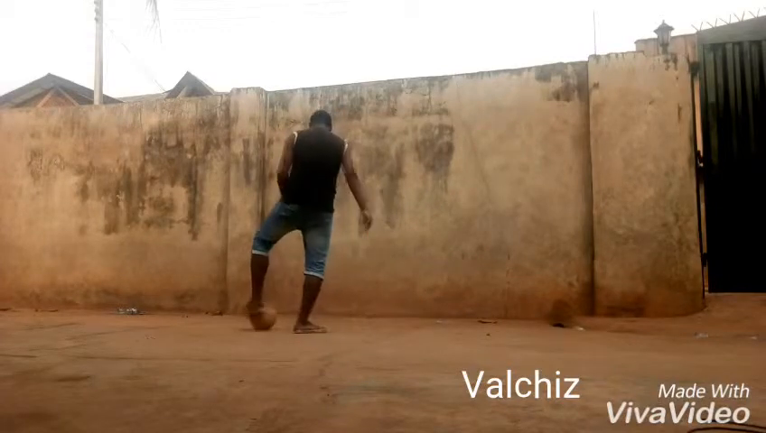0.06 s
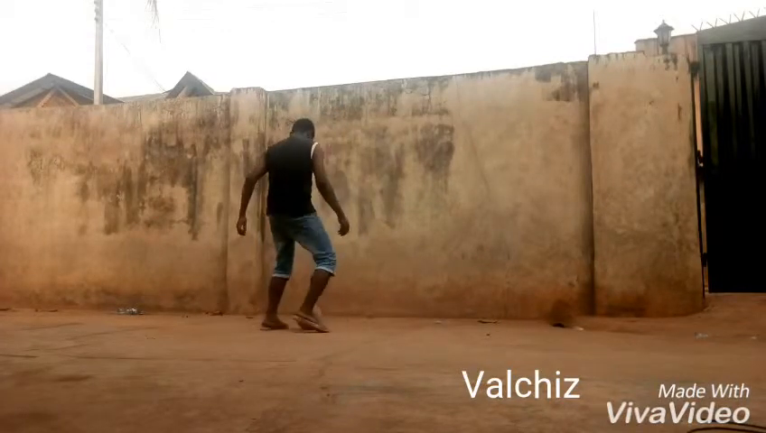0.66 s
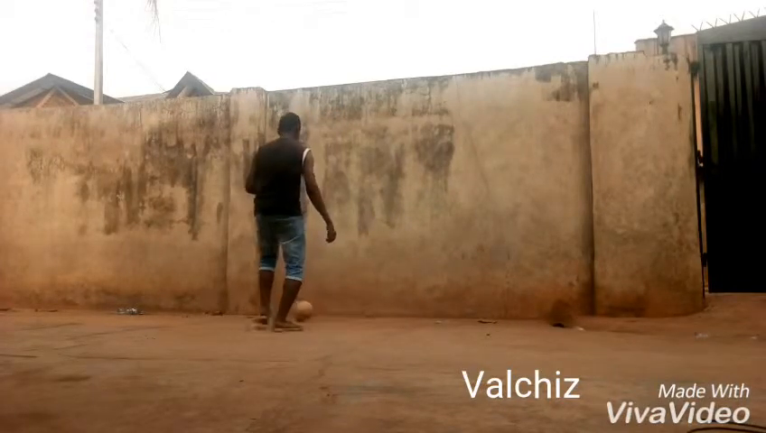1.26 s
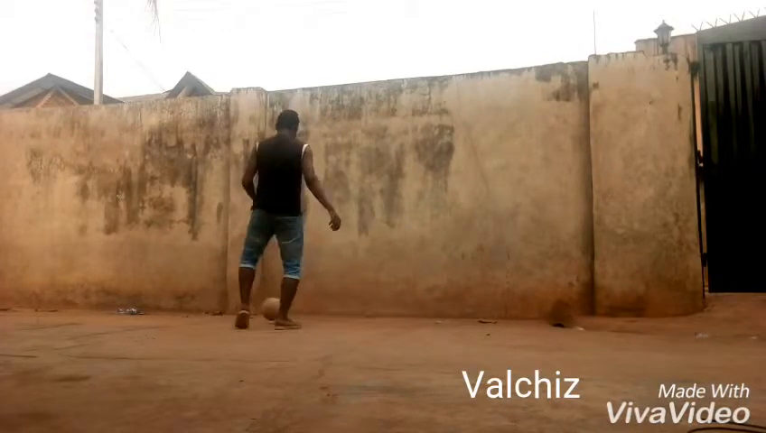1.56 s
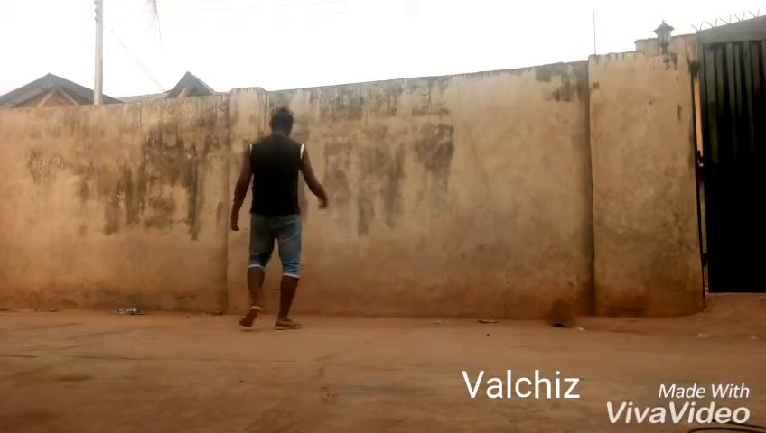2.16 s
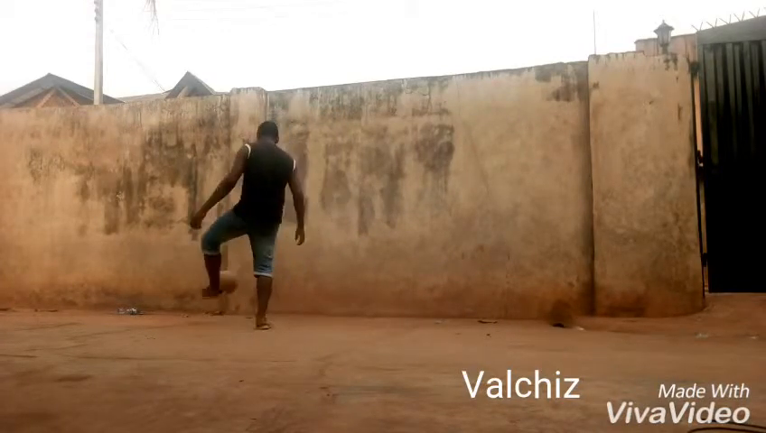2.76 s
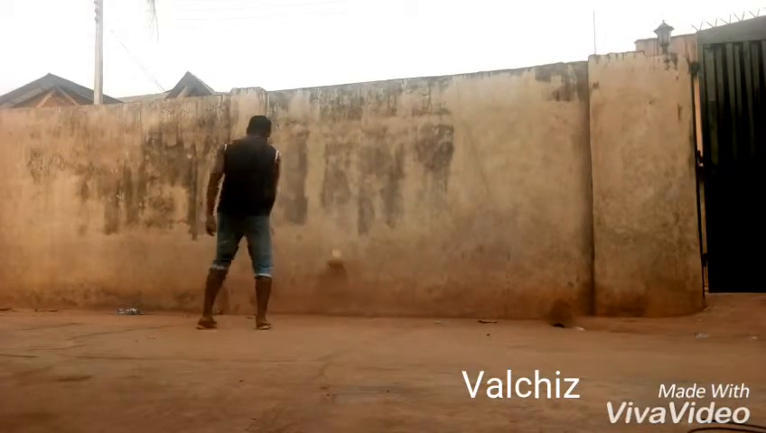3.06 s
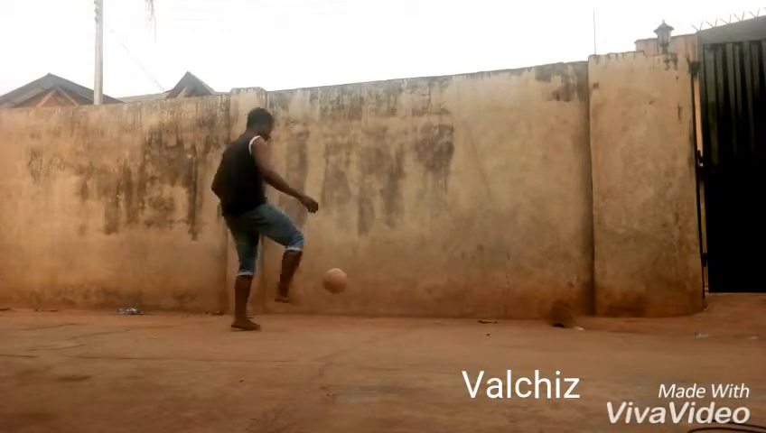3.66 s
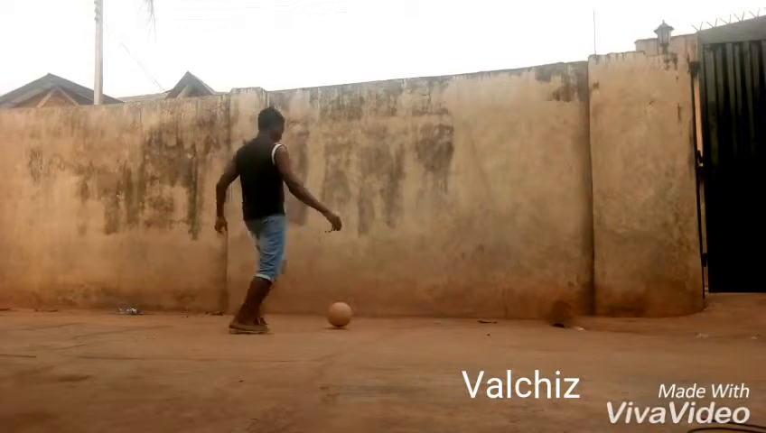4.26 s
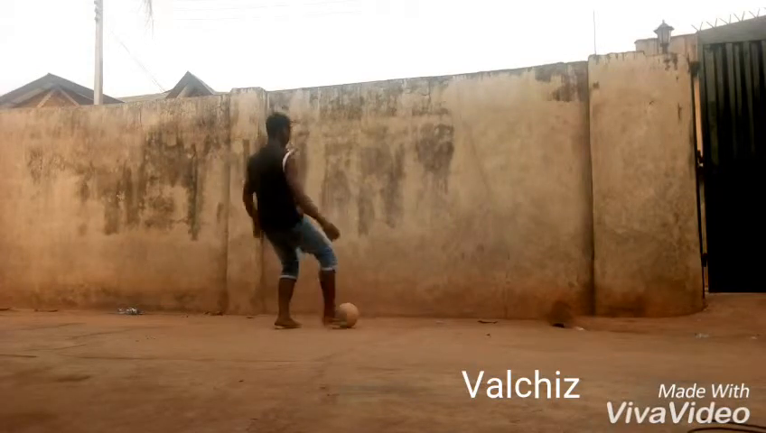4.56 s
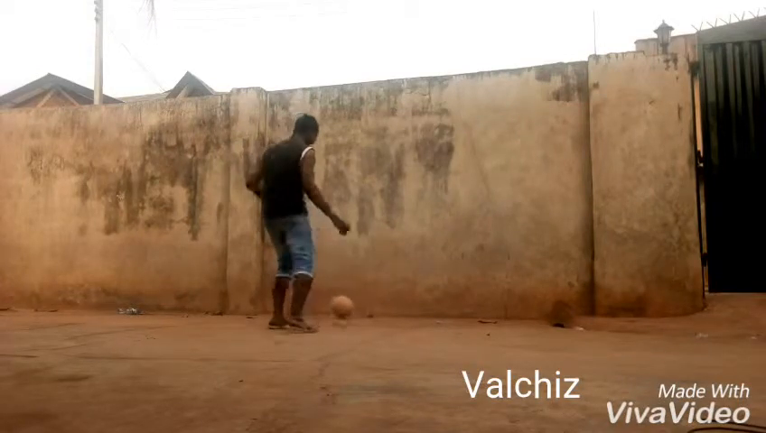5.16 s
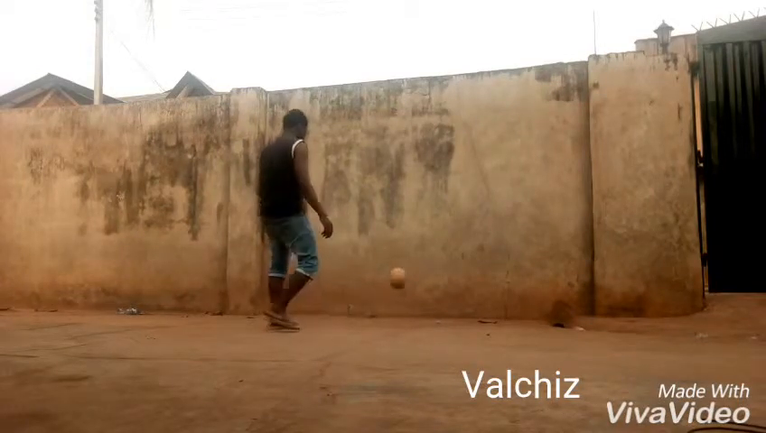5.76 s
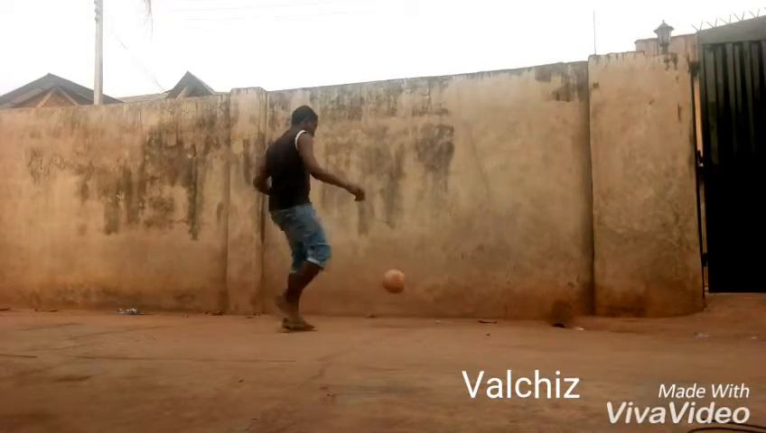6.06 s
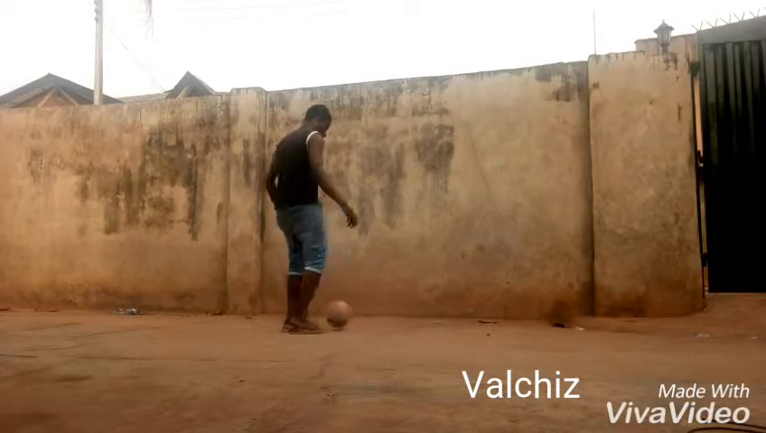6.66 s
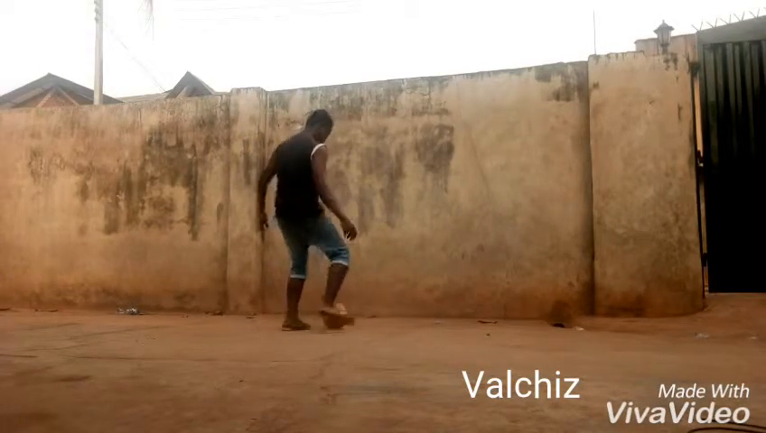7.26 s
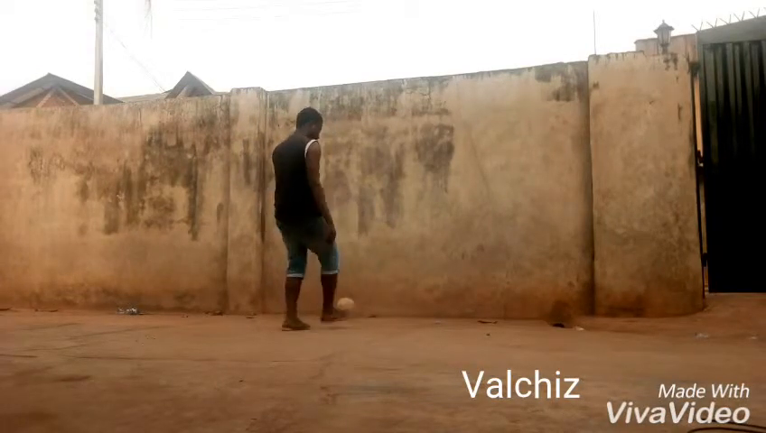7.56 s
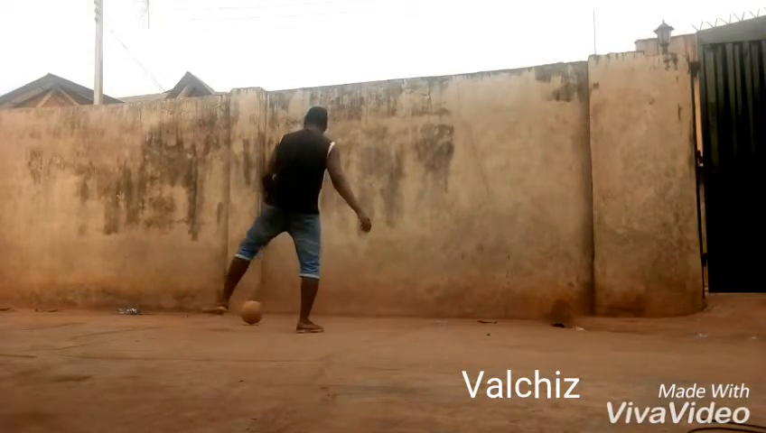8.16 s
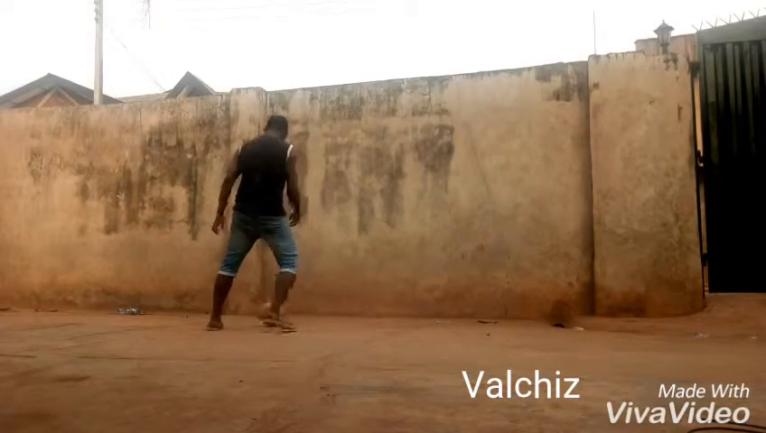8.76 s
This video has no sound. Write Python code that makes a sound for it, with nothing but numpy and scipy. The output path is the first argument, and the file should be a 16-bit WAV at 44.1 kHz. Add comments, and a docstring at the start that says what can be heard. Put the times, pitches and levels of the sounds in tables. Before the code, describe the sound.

In a walled outdoor yard, a small football is kicked against a wall six times. Each round, hollow kick is followed by a louder slapping thud that echoes with a brief low boom. Between the hits the ball bounces and is trapped, while sandals scrape on dusty paving with an occasional tick or tiny squeak. A faint neighbourhood hush lies underneath.

```python
"""A small football is kicked hard against a plastered yard wall six times, with bounces and soft touches.
Each blow layers a gritty slap of the skin, a hollow knock of the shell and a low thump as the ball
springs back; the wall hits also spray sand. Sandals and ball scrape over dusty paving, with the odd
clack or squeak, above a faint neighbourhood hush. The enclosing walls answer with echoes, a low boom
and a dense tail, and the houses beyond return the wall hits late and smeared."""
import sys
import numpy as np
from scipy import signal
from scipy.fft import rfft, irfft, next_fast_len
from scipy.io import wavfile

SR = 44100
rng = np.random.default_rng(int(sys.argv[2]) if len(sys.argv) > 2 else 0)


def put_to_file(sound):
    """Save the sound as 16-bit audio at rate SR, in the file named by the first command-line argument."""
    columns = np.atleast_2d(sound).T  # one column per channel
    safe = np.clip(columns, -1, 1)
    whole_steps = np.round(safe * 32767)
    wavfile.write(sys.argv[1], SR, whole_steps.astype(np.int16))


N = 396900
SPAN, RING = SR // 4, 32768  # samples for one contact, and for the yard's response
AGE = np.arange(SPAN) / SR
LEVEL_WINDOW_S = .08
YARD_HUM_HZ, YARD_HUM_T60_S = 210, .12  # a blow briefly sets the yard's low resonance humming

# Cue levels are relative: each layer adds its own trim before the yard.
# tone of the hush: freq_hz, level_db
HUSH_SPECTRUM = [(18, 11.5), (30, -6.5), (207, -5), (274, -6), (466, -8), (543, -10.5), (880, -10.5),
                 (1080, -19), (1290, -10.5), (1580, -17), (3130, -21.5), (6890, -31.5), (13000, -44)]
# fader ride on the hush: time_s, level_db
HUSH_RIDE = [(0, -59), (0.702, -59), (2, -60.5), (6.4, -61), (7.1, -58), (7.4, -61), (9, -60)]
# the ball lands or is trapped: start_s, thump_db, knock_db, slap_db, knock_hz, slap_tilt_db_per_octave
BOUNCE_CUES = [(0.073, -51.5, -47.5, -42.5, 730, -2), (0.813, -41, -37.5, -43, 610, -7),
               (2.4147, -37, -34.5, -39, 485, -2.5), (3.4204, -36, -35.5, -37.5, 583, -5.5),
               (3.927, -51, -58, -41.5, 573, -4), (3.954, -38.5, -35, -39, 530, -6),
               (5.989, -37, -35, -38, 850, -7), (6.502, -40.5, -38.5, -40.5, 1190, -8.5),
               (6.715, -61, -65, -49.5, 1000, -4.5), (8.496, -58, -56, -54.5, 775, -4)]
# the ball's shell and the air inside: pitch_hz, level_db, t60_s
BALL_RESONANCES = [(293, 14, 0.021), (427, 12.5, 0.06), (484, 0.5, 0.2), (545, 2.5, 0.025), (600, 14, 0.21),
                   (660, 19.5, 0.038), (736, 13, 0.09), (821, 17.5, 0.055), (850, 26, 0.063),
                   (957, 26, 0.059), (1130, 24, 0.085), (1340, 29.5, 0.015), (1428, 30.5, 0.043)]
# tone of the skin's slap: freq_hz, level_db
SLAP_SPECTRUM = [(200, -41), (700, -1), (1500, -3), (2500, -1), (4000, 1), (5500, 0.5), (6600, -6),
                 (7800, -22.5), (10500, -26.5), (13000, -44)]
# sandals or the skidding ball scrape over dusty paving: start_s, length_s, rasp_db, grit_db
SCRAPE_CUES = [(0.653, 0.036, -56, -61.5), (0.798, 0.021, -34, -37.5), (0.885, 0.028, -33, -42.5),
               (0.981, 0.028, -32.5, -41.5), (1.035, 0.051, -40, -43.5), (1.185, 0.045, -45, -47.5),
               (1.333, 0.0052, -38, -51.5), (1.599, 0.037, -52, -49.5), (3.995, 0.011, -41.5, -51),
               (4.207, 0.032, -48, -46.5), (4.445, 0.038, -59, -48.5), (4.772, 0.017, -32, -39),
               (5.051, 0.026, -41, -40), (5.106, 0.0091, -32.5, -46), (6.109, 0.019, -59, -52.5),
               (7.617, 0.021, -34.5, -38.5), (7.827, 0.029, -34, -42), (7.994, 0.025, -49.5, -58),
               (8.564, 0.04, -40.5, -45), (8.916, 0.031, -51, -70)]
# tone of a scrape's rasp around its resonance: pitch_ratio, level_db
RASP_SPECTRUM = [(.06, -15), (.2, -23), (.45, -14.5), (.7, 1), (1, 3.5), (1.22, 1), (1.5, 2), (2.1, -0.5),
                 (3, -2.5), (6, -17.5), (13, -109)]
# tone of crushed grit: freq_hz, level_db
GRIT_SPECTRUM = [(200, -27), (900, -1.5), (1800, -6), (3000, -3.5), (5400, -2.5), (6500, -10),
                 (7800, -23.5), (10500, -27.5), (13000, -44)]
# light steps that only crush grit: start_s, level_db
STEP_CUES = [(0.722, -57), (1.634, -53), (2.283, -55), (3.621, -56.5), (5.208, -50.5), (5.918, -59.5),
             (6.452, -64), (6.485, -54.5), (7.23, -63), (7.267, -63), (8.129, -63.5)]
# short bright ticks, either stray clacks or sharp wall echoes just after a ball hit: start_s, level_db
TICK_CUES = [(0.661, -73), (1.128, -48), (3.1135, -55.5), (3.421, -52), (3.9375, -56), (4.226, -45),
             (4.8885, -51), (5.929, -66), (7.7334, -45), (8.4949, -52.5), (8.529, -64), (8.609, -56),
             (8.622, -53)]
# brief rubber squeaks: start_s, level_db, pitch_hz
SQUEAK_CUES = [(.78, -59, 1410), (6.444, -53.5, 1460), (7.438, -45.5, 1375), (8.91, -59, 1400)]
# the foot drives the ball: start_s, thump_db, knock_db, slap_db, knock_hz, slap_tilt_db_per_octave
KICK_CUES = [(0.786, -50, -33.5, -53.5, 786, -5), (1.805, -38, -37.5, -47, 680, -3),
             (2.8163, -38.5, -26, -47, 880, -6), (4.652, -38.5, -36, -46.5, 729, -7),
             (5.4023, -34.5, -30, -44, 860, -4), (7.4354, -37, -33.5, -44, 980, -7)]
# the ball hits the wall: start_s, contact_s, knock_db, thump_db, slap_db, hum_db, sand_db, knock_hz
WALL_CUES = [(1.0968, 0.0088, -34, -27.5, -35, -57, -66, 765),
             (2.125, 0.012, -32.5, -29, -38.5, -35.5, -56.5, 627),
             (3.1553, 0.014, -31.5, -26.5, -38, -36.5, -60.5, 696),
             (4.8741, 0.012, -24.5, -25.5, -32.5, -46, -57, 600),
             (5.7115, .0102, -31, -24.5, -36, -34.5, -57, 651),
             (7.703, 0.011, -23.5, -27, -35, -52, -57, 550)]
# tone of sand knocked off the plaster: freq_hz, level_db
SAND_SPECTRUM = [(1500, -30), (5500, 5.5), (7500, 1.5), (10500, -9.5), (13000, -23)]
# standing waves between the walls: pitch_hz, level_db, t60_s
STANDING_WAVES = [(72.5, 13, .65), (100.5, 10, .6), (121, 6, .5), (134, 6, .45), (209, 11, .65)]
# echoes off the far walls: delay_s, level_db
WALL_ECHOES = [(.017, -16.5), (0.031, -5), (0.04, -7)]
# tone of the yard's tail: freq_hz, level_db
TAIL_SPECTRUM = [(50, 5), (130, 1.5), (250, 5), (600, 6), (1500, 1), (5000, -4.5), (12000, -2.5)]
# decay of the yard's tail: freq_hz, t60_s
TAIL_DECAY = [(60, 0.43), (250, 0.56), (550, 0.49), (1000, 0.46), (2000, 0.39), (5000, 0.48), (8000, 0.48),
              (13000, 0.14)]
# late echoes off the houses around: delay_s, spread_s, level_db
HOUSE_ECHOES = [(.09, .02, -30), (.29, .04, -44)]


def from_db(db):
    return 10 ** (np.asarray(db) / 20)


def at_level(x, db):
    """Sets a short sound's rms as if all its energy fell inside the level window."""
    return x * from_db(db) / np.sqrt(np.sum(x ** 2) / (LEVEL_WINDOW_S * SR) + 1e-20)


def at_hz(points, hz):
    """Reads a table on a log-frequency axis."""
    freqs, values = np.transpose(points)
    return np.interp(np.log(np.maximum(hz, 1)), np.log(freqs), values)


def butter(x, hz, kind, order=2):
    """Causal Butterworth filter."""
    return signal.sosfilt(signal.butter(order, hz, kind, fs=SR, output="sos"), x + 1e-18)


def coloured(x, spectrum):
    """Minimum-phase EQ, so that nothing sounds ahead of the attack."""
    size = 2 * next_fast_len(len(x))
    gain = from_db(at_hz(spectrum, np.fft.rfftfreq(size, 1 / SR)))
    cepstrum = irfft(np.log(gain))
    cepstrum[1:size // 2] *= 2
    cepstrum[size // 2 + 1:] = 0
    return irfft(rfft(x, size) * np.exp(rfft(cepstrum)))[:len(x)]


def resonate(x, hz, t60):
    """A resonance with unity gain at its peak."""
    r = from_db(-60 / (t60 * SR))
    feedback = [1, -2 * r * np.cos(2 * np.pi * hz / SR), r * r]
    return signal.lfilter([(1 - r * r) / 2, 0, (r * r - 1) / 2], feedback, x + 1e-18)


def add(track, start_s, x):
    """Mixes a short sound into a track."""
    start = max(int(start_s * SR), 0)
    track[start:start + len(x)] += x[:len(track) - start]


def push(rise_s, start_s=0):
    """A smooth pulse that swells to one over rise_s and dies away."""
    u = np.maximum(AGE - start_s, 0) / rise_s
    return (u * np.exp(1 - u)) ** 2


def neighbourhood_hush():
    """A faint bed of noise; its mids flicker, now at one pitch, now at another."""
    hush = coloured(rng.standard_normal(N), HUSH_SPECTRUM)
    hush = hush / np.std(hush)
    for position, pitch, size in rng.random((50, 3)):
        hz = 400 * 2 ** (1.7 * pitch)
        flicker = resonate(push(.03) * rng.standard_normal(SPAN), hz, t60=.03)
        add(hush, position * N / SR, at_level(flicker * size, -8))
    ride_db = np.interp(np.arange(N) / SR, *np.transpose(HUSH_RIDE))
    return from_db(ride_db) * hush


def knock(force, centre_hz, hollow_db, hollow_t60, ring_db, low_hz, sustain):
    """The contact pulse, a hollow resonance set by the spot struck, and the shell ringing near it."""
    out = butter(force, low_hz, "high", order=1)
    out += from_db(hollow_db) * resonate(force, centre_hz, hollow_t60)
    for hz, db, t60 in BALL_RESONANCES:
        nearness = np.exp(-(np.log2(hz / centre_hz) / .5) ** 2) + from_db(-14)
        chance_db, detune = rng.normal(0, 2), rng.normal(1, .008)
        ring = resonate(force, hz * detune, t60 * sustain)
        out += nearness * from_db(db + ring_db + chance_db) * ring
    return out


def thump(hz, decay_s):
    """The squashed ball draws air in and springs back: about one low cycle."""
    return -np.sin(2 * np.pi * hz * AGE) * np.exp(-AGE / decay_s)


def dust_grains(spread_db, crack_db, cracks_per_s=220):
    """Friction noise in millisecond grains of uneven size, with single sand grains cracking."""
    grain_index = np.arange(SPAN) // (SR // 1000)
    sizes = from_db(spread_db * rng.standard_normal(SPAN))[grain_index]
    friction, cracks = rng.standard_normal((2, SPAN))
    cracking = rng.random(SPAN) < cracks_per_s / SR
    return friction * sizes + from_db(crack_db) * cracks * cracking


def slap(crack_s, crunch_s, crunch_db, tilt_db):
    """A sharp crack of the skin, then dust crushed under it."""
    snap = from_db(8) * signal.unit_impulse(SPAN)
    crack = rng.standard_normal(SPAN) * np.exp(-AGE / crack_s)
    crunch = from_db(crunch_db) * dust_grains(spread_db=6.5, crack_db=16) * np.exp(-AGE / crunch_s)
    spectrum = [(hz, db + tilt_db * np.log2(max(hz, 1300) / 3000)) for hz, db in SLAP_SPECTRUM]
    return coloured(snap + crack + crunch, spectrum)


def soft_blow(thump_db, knock_db, slap_db, knock_hz, tilt_db, echo_db, crunch_db):
    """Foot or ground strikes and damps the shell; the near wall sends the blow back a moment later."""
    force = push(.00032) + 1.2 * push(.0001)
    hollow = knock(force, knock_hz, hollow_db=17, hollow_t60=.016, ring_db=7, low_hz=450, sustain=1)
    body = (at_level(thump(hz=157, decay_s=.0028), thump_db - 3.5)
            + at_level(hollow, knock_db - 10)
            + at_level(resonate(force, YARD_HUM_HZ, YARD_HUM_T60_S), thump_db - 13))
    out = np.zeros(SPAN)
    for delay_s, db in ((0, 0), (.0093, echo_db)):
        # rough plaster scatters the treble, so the echo's crack has a grain of its own
        crack = slap(crack_s=.0031, crunch_s=.017, crunch_db=crunch_db, tilt_db=tilt_db)
        add(out, delay_s, from_db(db) * (body + at_level(crack, slap_db + 2.5)))
    return out


def bounces():
    """Landings are mostly slap and crunching dust; the harder ones carry more thump and knock."""
    for start_s, *touch in BOUNCE_CUES:
        yield start_s, soft_blow(*touch, echo_db=-6, crunch_db=4)


def rasp(length_s, db):
    """A sandal or the skidding ball scrapes over the paving, lower in pitch the louder it rasps."""
    resonance_hz = 1080 * 2 ** (-.02 * (db + 38))
    friction = push(length_s * .52) * dust_grains(spread_db=3.5, crack_db=11)
    spectrum = [(ratio * resonance_hz, level_db) for ratio, level_db in RASP_SPECTRUM]
    return at_level(coloured(friction, spectrum), db - 3.5)


def sand_cracks(per_s, ring_cycles=7):
    """Single grains crack at random, each with a size and a brief pitch of its own; rms one."""
    sizes = rng.standard_normal(SPAN) * from_db(2 * rng.standard_normal(SPAN))
    cracks = sizes * (rng.random(SPAN) < per_s / SR)
    pitches_hz = np.geomspace(2200, 11500, 10)
    choice = rng.integers(0, len(pitches_hz), SPAN)
    out = sum(resonate(cracks * (choice == k), hz, ring_cycles / hz) for k, hz in enumerate(pitches_hz))
    return out / (np.std(out) + 1e-20)


def grit(length_s, db):
    """Sand is crushed under sole or ball: fine friction with single cracking grains."""
    sand = rng.standard_normal(SPAN) + from_db(2.5) * sand_cracks(per_s=900)
    crunch = coloured(push(length_s * .59) * sand, GRIT_SPECTRUM)
    return at_level(butter(crunch, 1210, "high"), db)


def tick(db):
    """A short bright tick: a stray clack, or a sharp wall echo just after a ball hit."""
    burst = coloured(rng.standard_normal(SPAN) * np.exp(-AGE / .0034), GRIT_SPECTRUM)
    return at_level(butter(burst, 1800, "high"), db)


def squeak(db, hz, rise_s=.0032, fall_octaves_per_s=22):
    """Rubber slips in a rough chirp that falls in pitch as it lets go."""
    pitch_hz = hz * 2 ** (-fall_octaves_per_s * (AGE - rise_s))
    chirp = np.sin(2 * np.pi * np.cumsum(pitch_hz) / SR)
    roughness = .37 * coloured(rng.standard_normal(SPAN), SLAP_SPECTRUM)
    return at_level(push(rise_s) * (chirp + roughness), db)


def scrapes_and_steps():
    """Scrapes of sandal or ball swell and die as rasp and grit, among light steps, ticks and squeaks."""
    for start_s, length_s, rasp_db, grit_db in SCRAPE_CUES:
        yield start_s, rasp(length_s, rasp_db) + grit(length_s, grit_db)
    for start_s, db in STEP_CUES:
        yield start_s, grit(length_s=.028, db=db)
    for start_s, db in TICK_CUES:
        yield start_s, tick(db)
    for start_s, db, hz in SQUEAK_CUES:
        yield start_s, squeak(db, hz)


def kicks():
    """The foot gives a round thump and knock with little slap."""
    for start_s, *touch in KICK_CUES:
        yield start_s, soft_blow(*touch, echo_db=-1, crunch_db=-13.5)


def wall_hits(release_s=.00058):
    """The ball flattens in a sharp pulse, pops out in a broader, opposite one, and knocks sand loose."""
    for start_s, contact_s, knock_db, thump_db, slap_db, hum_db, sand_db, knock_hz in WALL_CUES:
        release = push(release_s, start_s=contact_s - release_s)
        force = .7 * push(.00014) - 1.2 * release
        yard_hum = resonate(release, YARD_HUM_HZ, YARD_HUM_T60_S)
        # the harder the blow, the longer the ball rings as it flies off
        sustain = from_db(.8 * (knock_db + 31))
        hollow = knock(force, knock_hz, hollow_db=3, hollow_t60=.008,
                       ring_db=2, low_hz=250, sustain=sustain)
        low = thump(hz=102, decay_s=.007)
        crack = slap(crack_s=.00058, crunch_s=.051, crunch_db=-23, tilt_db=-5)
        spray = coloured(push(.023) * sand_cracks(per_s=700), SAND_SPECTRUM)
        body = at_level(yard_hum, hum_db - 10.5) + at_level(low, thump_db - 11.5)
        body += at_level(hollow, knock_db - 6.5)
        yield start_s, body + at_level(crack, slap_db - 5) + at_level(spray, sand_db)


def tail_bands(build_s):
    """Octave bands of the yard's tail: the spectrum of each, and how it builds up and dies."""
    t, hz = np.arange(RING) / SR, np.fft.rfftfreq(RING, 1 / SR)
    band = np.arange(9)[:, None]
    octave = np.log2(np.clip(hz, 50, 12800) / 50)
    shapes = np.maximum(1 - abs(octave - band), 0) * from_db(at_hz(TAIL_SPECTRUM, hz))
    t60 = at_hz(TAIL_DECAY, 50 * 2 ** band)
    envelopes = (1 - np.exp(-(t / build_s) ** 2)) * np.exp(-np.log(1000) * t / t60)
    early_energy = np.sum(envelopes[:, t < LEVEL_WINDOW_S] ** 2, axis=1, keepdims=True)
    return shapes, envelopes / np.sqrt(early_energy)


def yard(sounds, direct_db, echo_db, tail_db, boom_db):
    """Direct sound, wall echoes, standing waves and a dense tail; each spot has its own reflections."""
    click = signal.unit_impulse(RING)
    boom = sum(from_db(db + boom_db) * resonate(click, hz, t60) for hz, db, t60 in STANDING_WAVES)
    shapes, envelopes = tail_bands(build_s=.014)
    out = np.zeros(N)
    for start_s, sound in sounds:
        noise_bands = irfft(rfft(rng.standard_normal(RING)) * shapes)
        tail = np.sum(noise_bands * envelopes, axis=0)
        response = from_db(direct_db) * click + boom + from_db(tail_db) * tail
        for delay_s, db in WALL_ECHOES:
            add(response, delay_s + rng.normal(0, .00056), from_db(db + echo_db) * click)
        add(out, start_s, signal.fftconvolve(sound, response))
    return out


def houses(hits, band_hz=(338, 810)):
    """Houses beyond the yard return the mids of a loud hit, late and smeared."""
    out = np.zeros(N)
    for delay_s, spread_s, db in HOUSE_ECHOES:
        smear = butter(push(spread_s) * rng.standard_normal(SPAN), band_hz, "band")
        response = smear * from_db(db) / np.sqrt(np.sum(smear ** 2))
        add(out, delay_s, signal.fftconvolve(hits, response))
    return out


def scene():
    """Ball, feet and hush sit in the centre; only the treble flutters a little from side to side."""
    hits = yard(wall_hits(), direct_db=4.5, echo_db=-.5, tail_db=3.5, boom_db=2.5)
    mid = (hits + houses(hits)
           + yard(kicks(), direct_db=-2.5, echo_db=-10, tail_db=-4, boom_db=-13.5)
           + yard(bounces(), direct_db=-3.5, echo_db=-16.5, tail_db=-5, boom_db=-13)
           + neighbourhood_hush()
           + yard(scrapes_and_steps(), direct_db=.5, echo_db=-15, tail_db=-.5, boom_db=-16))
    flutter = butter(rng.standard_normal(N), 300, "low")
    pan = np.tanh(3 * flutter / np.std(flutter))
    side = from_db(-7) * butter(mid * pan, 5520, "high", order=8)
    return np.array([mid + side, mid - side])


def record(dry):
    """A small microphone loses the deep bass; the top is cut steeply."""
    thin = butter(dry, 48, "high", order=6)
    top_cut = signal.ellip(10, .2, 80, 13200, fs=SR, output="sos")
    return signal.sosfilt(top_cut, thin)


dry = scene()
out = record(dry)
put_to_file(out)
```